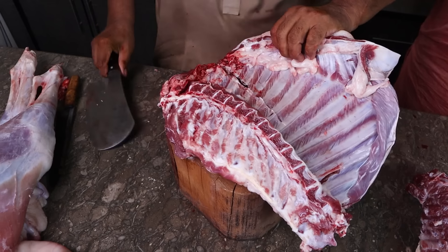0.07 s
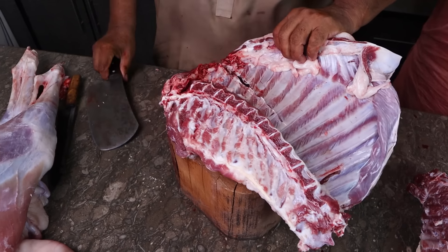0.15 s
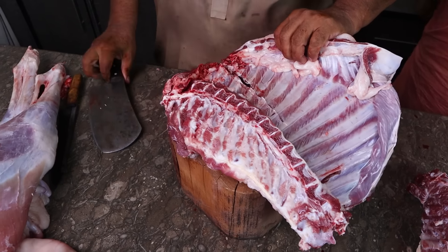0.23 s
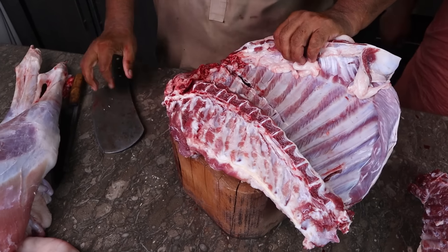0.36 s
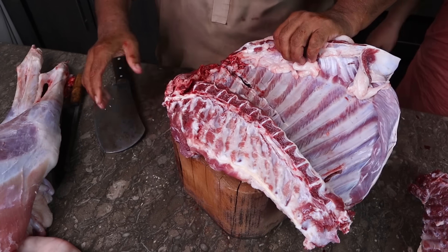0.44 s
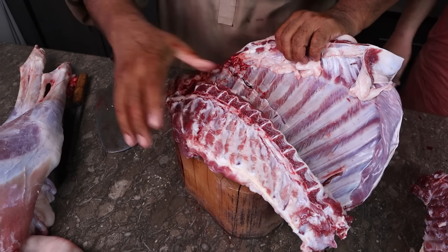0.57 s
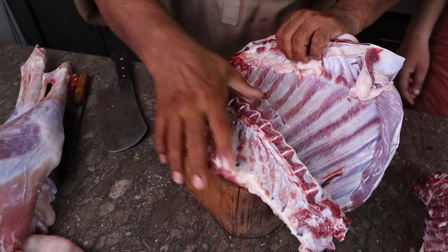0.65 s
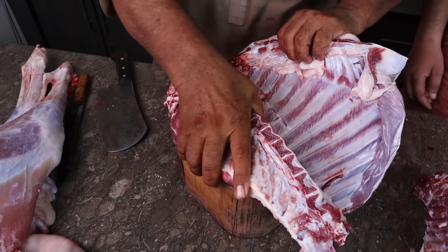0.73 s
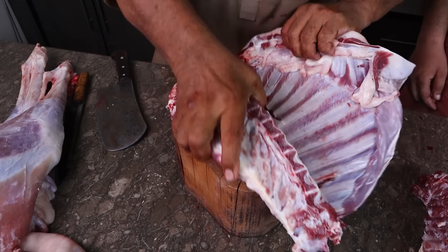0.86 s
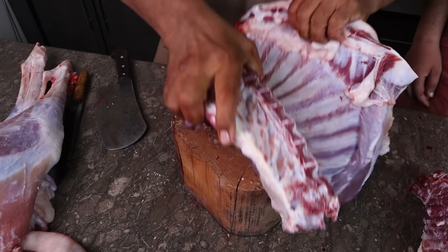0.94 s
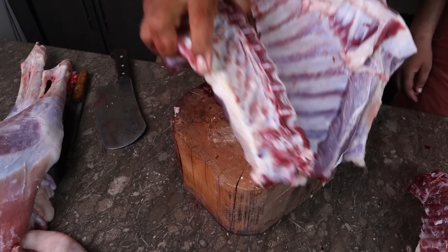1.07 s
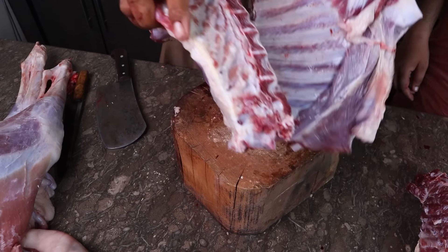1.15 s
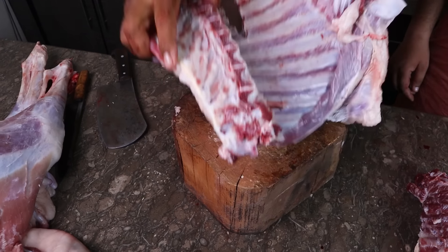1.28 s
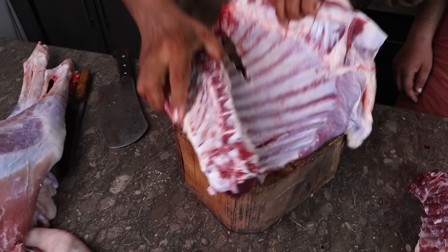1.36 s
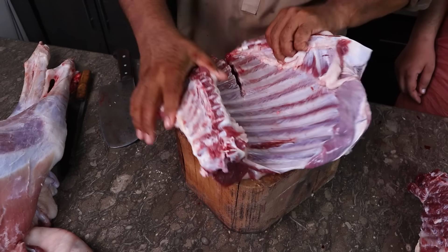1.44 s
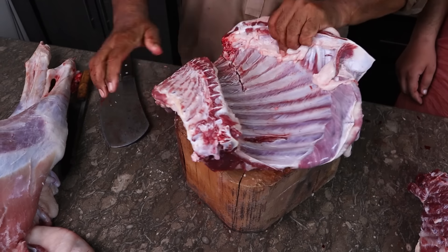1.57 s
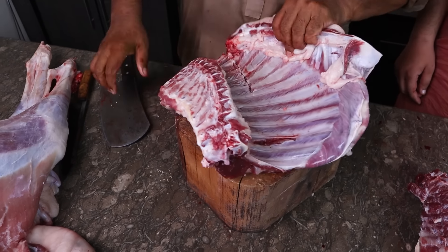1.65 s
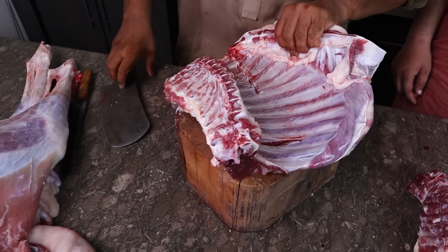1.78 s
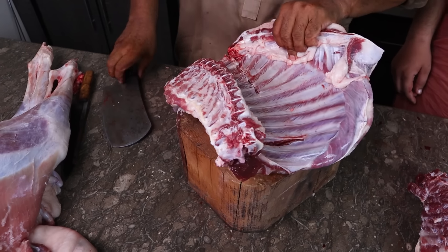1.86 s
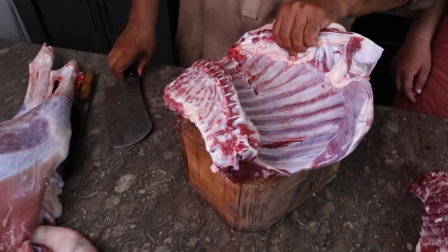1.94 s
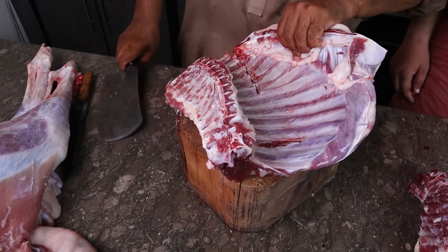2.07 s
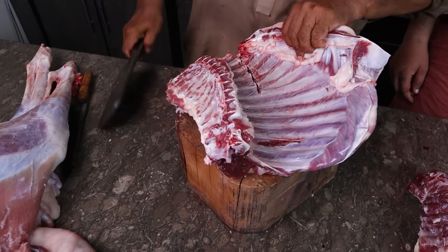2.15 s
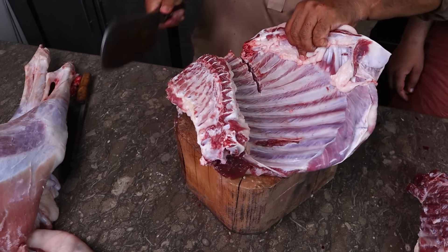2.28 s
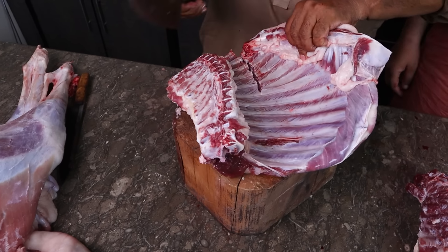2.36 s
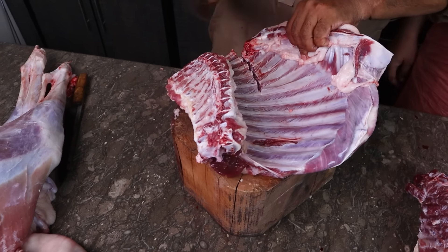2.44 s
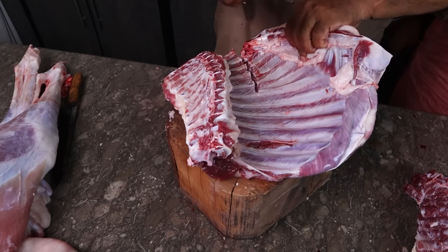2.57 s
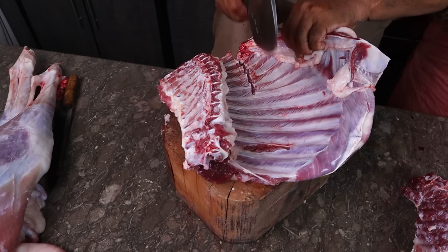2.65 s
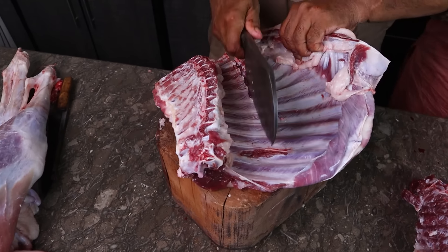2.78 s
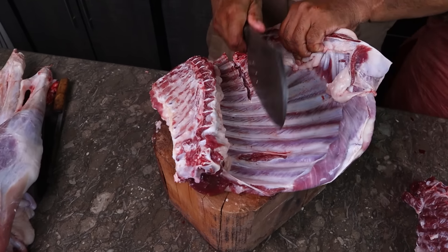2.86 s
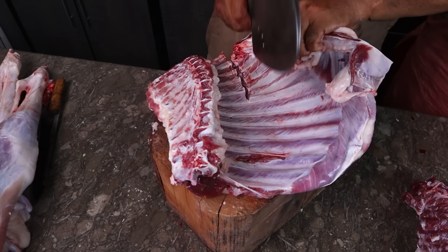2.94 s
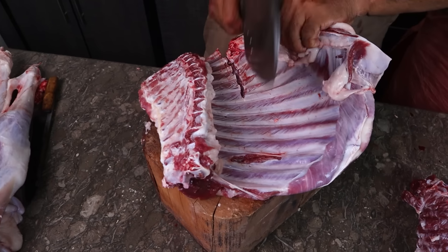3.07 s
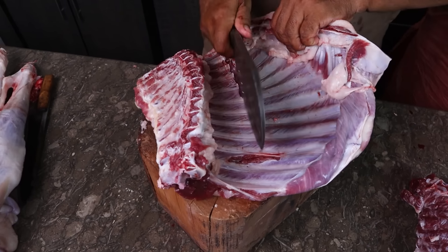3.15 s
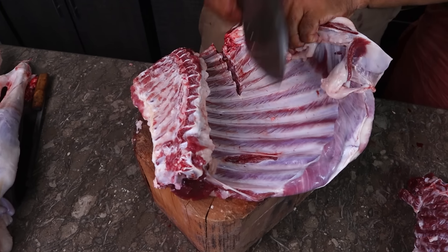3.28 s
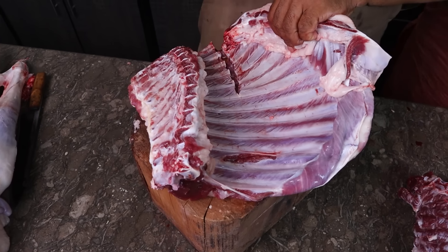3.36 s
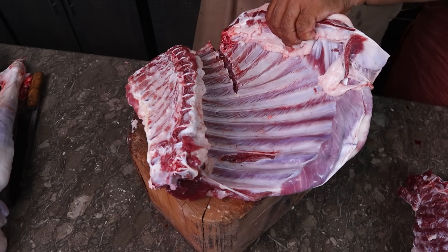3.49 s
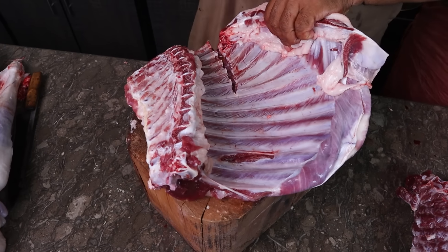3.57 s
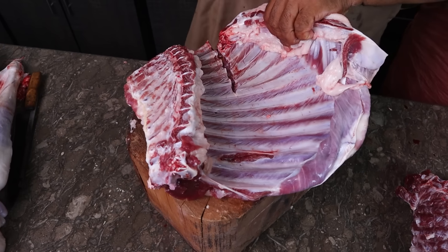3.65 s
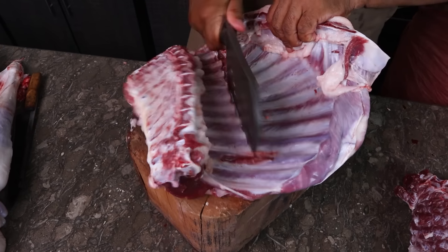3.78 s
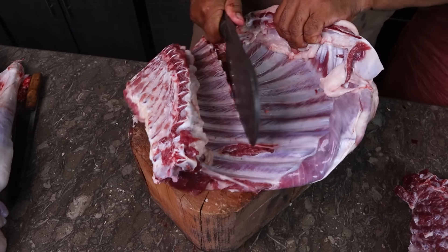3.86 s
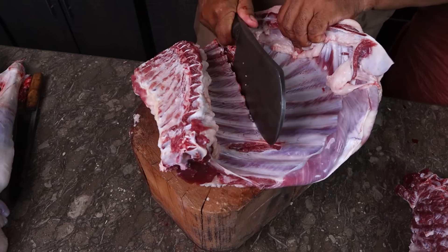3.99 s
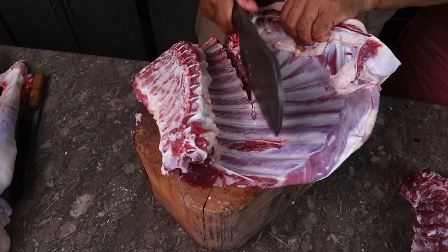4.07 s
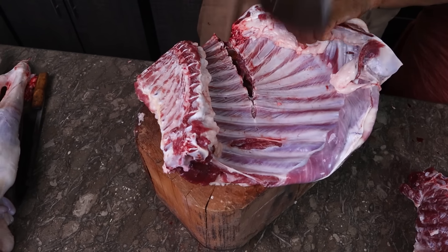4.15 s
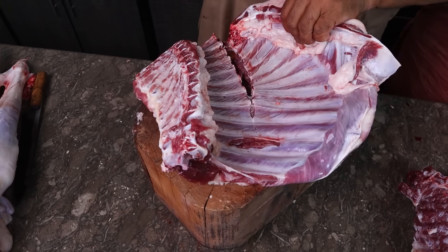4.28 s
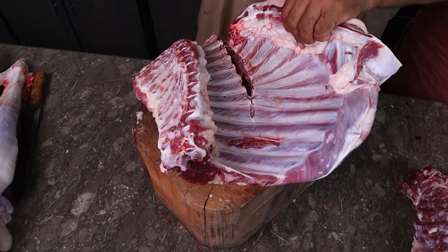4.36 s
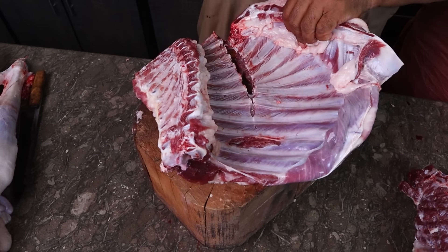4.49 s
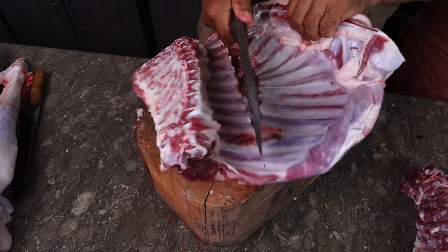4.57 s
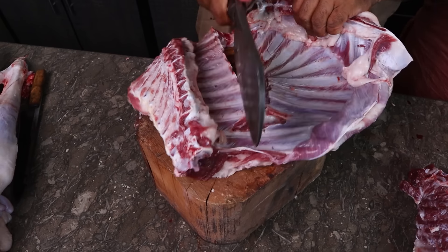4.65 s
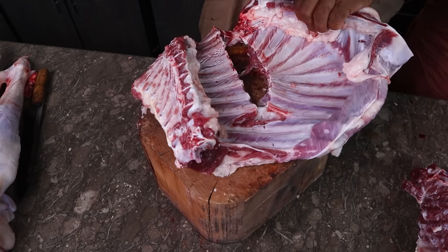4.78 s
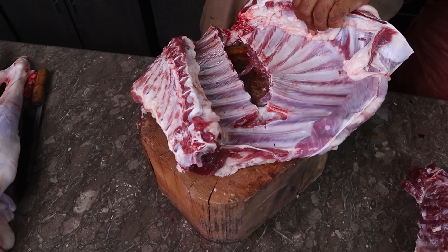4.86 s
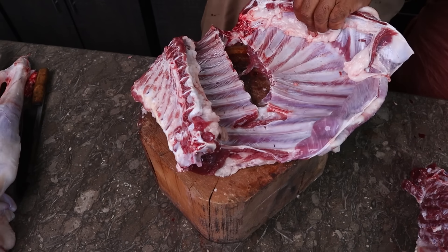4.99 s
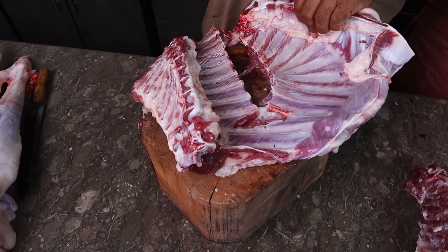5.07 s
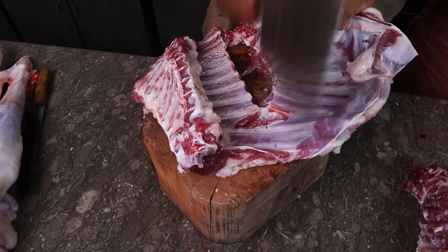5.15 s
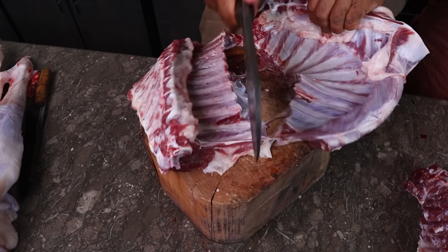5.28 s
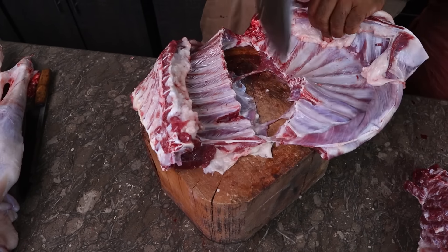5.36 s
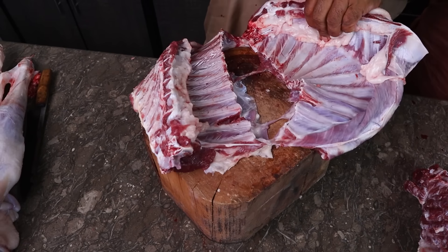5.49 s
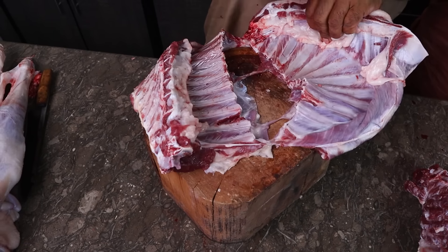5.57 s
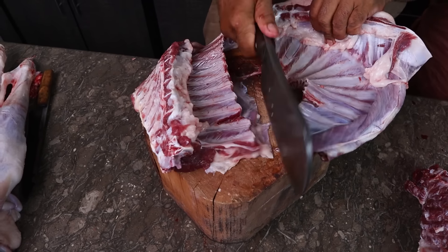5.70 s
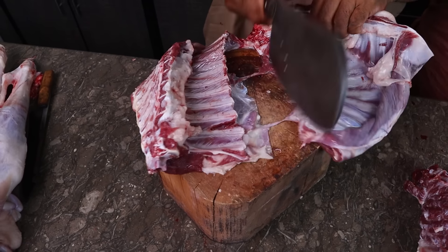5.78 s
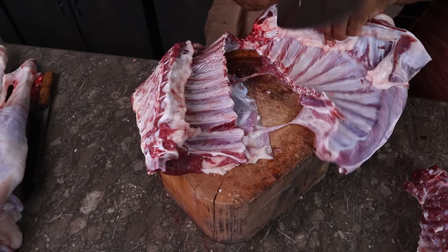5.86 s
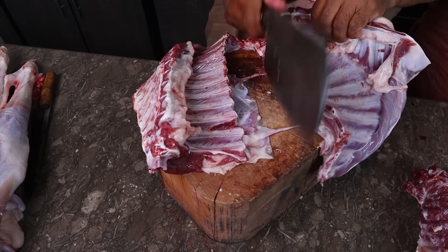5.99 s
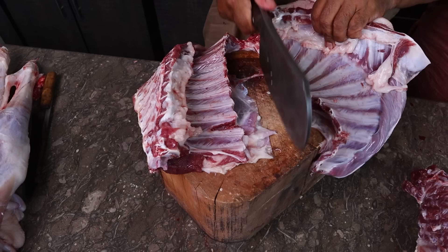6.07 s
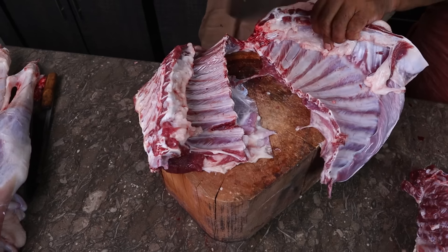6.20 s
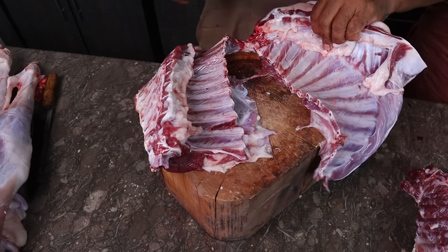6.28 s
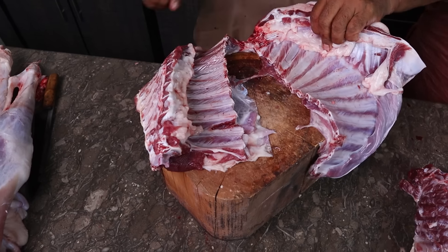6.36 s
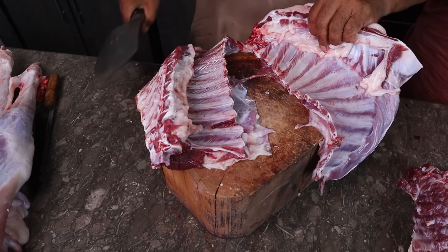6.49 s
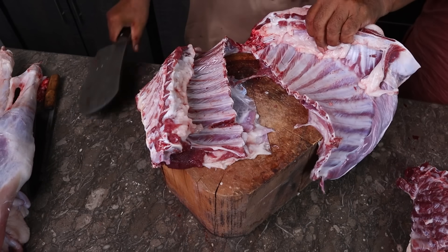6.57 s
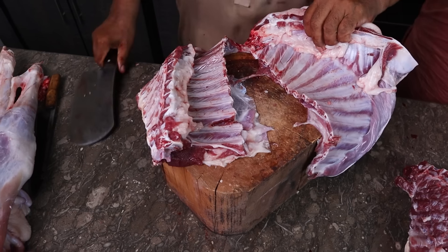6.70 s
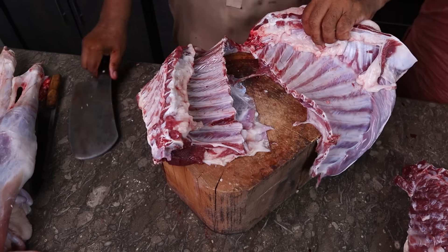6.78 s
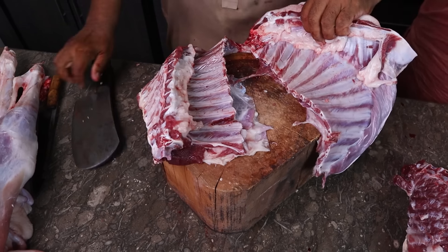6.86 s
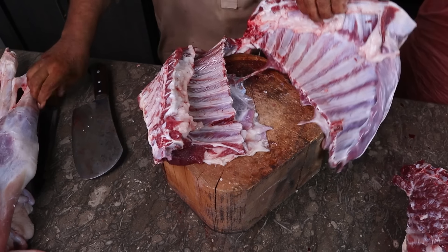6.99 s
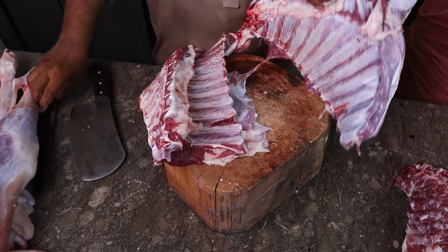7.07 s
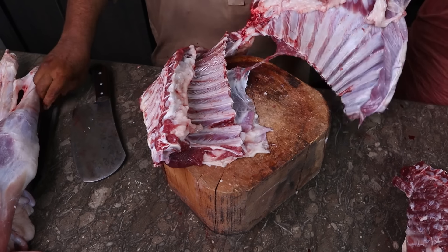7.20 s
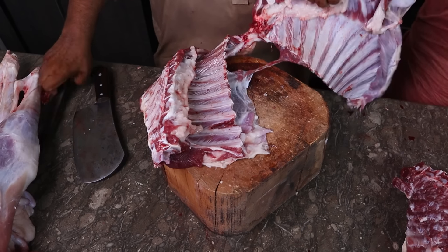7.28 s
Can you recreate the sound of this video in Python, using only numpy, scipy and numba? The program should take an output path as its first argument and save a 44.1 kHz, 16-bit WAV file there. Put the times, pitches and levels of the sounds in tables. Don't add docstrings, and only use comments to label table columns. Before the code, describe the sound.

Heard close on a phone in a small, hard, ringing room with steady fan hum and faint rattle: the blade clinks and settles on stone, hands handle sticky meat with small ticks, then uneven cleaver strokes splinter bone and knock wood, distorting and briefly ducking the background. A sharp snap comes with the last cut, then the blade rattles onto stone and rings.

```python
import sys
import numpy as np
from scipy import signal
from scipy.fft import rfft, irfft
from scipy.io import wavfile
from scipy.ndimage import uniform_filter1d
from numba import njit

SR = 44100
rng = np.random.default_rng(int(sys.argv[2]) if len(sys.argv) > 2 else 0)


def wav_record(signal):
    frames = np.transpose(np.atleast_2d(signal))
    bounded = np.clip(frames, -1, 1)
    quanta = np.round(bounded * 32767).astype(np.int16)
    wavfile.write(sys.argv[1], SR, quanta)


def ratio_of_db(decibels):
    return 10 ** (np.asarray(decibels, float) / 20)


N = 323416
T = np.arange(N) / SR

# frequency in Hz, level in dB.
BONE_SPECTRUM = [(300, 7.5), (1000, 11.5), (2000, 11), (3500, -1.5), (5000, -3), (8000, -12), (12000, -14),
                 (14500, -18), (16500, -54)]


def unit(x):
    return x / np.sqrt(np.mean(x ** 2))


def along(table, hz):
    table_hz, value = np.transpose(table)
    return np.interp(np.log(hz), np.log(table_hz), value)


def band(x, hz, width):
    edges = [hz / width, min(hz * width, .49 * SR)]
    return signal.sosfilt(signal.butter(2, edges, "bandpass", fs=SR, output="sos"), x)


def spread(table, size, tilt_db):
    hz = np.fft.rfftfreq(size, 1 / SR) + 1
    return ratio_of_db(along(table, hz) + tilt_db * np.log2(hz / 2000))


def coloured(table, size, tilt_db=0.):
    return unit(irfft(rfft(rng.standard_normal(size)) * spread(table, size, tilt_db), size))


def add(out, s, x):
    i = int(s * SR)
    out[i:i + len(x)] += x[:N - i]


def walk(rate):
    k = int(SR / rate)
    held = np.repeat(rng.standard_normal(N // k + 1), k)
    return uniform_filter1d(uniform_filter1d(held, k), k)[:N]


def ring(modes, seconds, scatter_db, push, longest=.55, loose=1):
    t = np.arange(int(seconds * SR)) / SR
    hz, db, t60 = np.array(modes, float).T[:, :, None]
    share, turn = rng.standard_normal((2, len(modes), 1))
    phase = loose * turn + np.pi * (loose < 1) * np.arange(len(modes))[:, None]
    decay = ratio_of_db(-60 * t / np.clip(t60, .005, longest))
    y = ratio_of_db(db + scatter_db * share) * np.sin(2 * np.pi * hz * t + phase) * decay
    return y.sum(0) / np.sqrt(np.sum(ratio_of_db(2 * db))) * (1 - np.exp(-t / push))


def wood(s, thud_db, thud_hz, knock_db):
    # frequency in Hz, level in dB, t60 in seconds.
    block_modes = [(349, -3, 0.013), (423, 0.5, 0.02), (411, -1.5, 0.031), (520.4, 4.5, 0.022),
                   (636.6, 2.5, 0.015), (754, 2, 0.024), (938, -15, 0.06), (1004, -5, 0.027),
                   (1260, -8.5, 0.018), (1625, -1, 0.0077)]
    # ratio to the thud pitch, level in dB, t60 in seconds.
    counter_modes = [(.62, -9, .04), (1, 0, .05), (1.3, -4, .04), (1.56, -2, .06), (1.95, -3, .04)]
    out = np.zeros(N)
    block = np.minimum(block_modes, [20000, 20, .045])
    counter = np.minimum(counter_modes, [3, 20, .08]) * [thud_hz, 1, 1]
    add(out, s, ratio_of_db(knock_db + 17.5) * ring(block, .2, 0.93, 0.0016, loose=0.12))
    add(out, s + 0.0017, ratio_of_db(thud_db + 10.0) * ring(counter, .3, 1.03, 0.0014, loose=0.3))
    return out


def crack(fast, slow, slow_db, tilt_db=0.):
    t = np.arange(4096) / SR
    grain = ratio_of_db(3.2 * np.repeat(rng.standard_normal(64), 64))
    burst = np.exp(-(t / fast) ** 2) * (1 - np.exp(-t / 0.0012))
    crunch = ratio_of_db(slow_db) * grain * np.exp(-t / slow)
    return coloured(BONE_SPECTRUM, 4096, tilt_db) * (burst + crunch)


def sideways(db, tilt_db):
    return ratio_of_db(db) * unit(np.roll(irfft(spread(BONE_SPECTRUM, 256, tilt_db)), 128))


def strokes():
    # start in seconds, counter thud in dB, thud pitch in Hz, block knock in dB, bone crack in dB.
    chops = [
        (3.28, -18.5, 126, -38, -30),
        (3.931, -4.5, 170.5, -12.5, -15),
        (4.7056, -5, 176, -10.5, -17),
        (5.3325, -10.5, 177, -8, -14.5),
        (5.848, -9.5, 176, -6.5, -11),
        (6.180, -11.5, 182, -9.5, -20.5),
    ]
    body, cracks, echoed = np.zeros((3, N))
    for s, thud_db, thud_hz, knock_db, crack_db in chops:
        tilt_db = -1.27 + 0.28 * np.clip(thud_db - knock_db, -6, 8)
        body += wood(s + 0.002552, thud_db, thud_hz, knock_db)
        add(cracks, s + 0.001282, ratio_of_db(crack_db + 3.5) * crack(0.0088, 0.025, -9.5, tilt_db))
        add(echoed, s, sideways(crack_db + 4.6, tilt_db))
    return body, cracks, echoed


def snaps():
    # start in seconds, level in dB.
    later_bones = [
        (3.935, -36),
        (3.942, -28),
        (3.945, -10),
        (4.713, -28),
        (4.726, -60),
        (5.335, -20),
        (5.856, -12),
        (6.202, -3),
    ]
    out = np.zeros(N)
    for s, db in later_bones:
        add(out, s, ratio_of_db(db) * crack(0.00045, 0.005, -59))
    return out


def blade(modes):
    hz = 1400 * 10 ** rng.random(260)
    swarm = np.transpose([hz, -3.0 * np.log2(hz / 4000), 0.55 * (hz / 4000) ** -.4])
    size = int(.7 * SR)
    chatter = walk(90)
    out = ratio_of_db(-3.5 + 2 * chatter[:size]) * ring(swarm, .7, 4., .0005)
    for k, (hz, db, t60) in enumerate(modes):
        twins = [(hz, 0, t60), (hz + 28 * rng.uniform(-1.4, 1.4), -6, t60)]
        flutter = chatter[(k + 1) * size // 4:][:size]
        out += ratio_of_db(db - 5 + 5 * flutter) * ring(twins, .7, 1., .0005, longest=1)
    return out


def cleaver_laid():
    # start in seconds, thud in dB, knock in dB, crack in dB, blade ring in dB.
    landings = [
        (.226, -64, -24, -19, -29.5),
        (.257, -62, -37, -43, -36),
        (.427, -20, -26.5, -28.5, -37),
        (.465, -23.5, -38, -50, -40.5),
        (6.796, -56, -22.5, -21.5, -31),
        (6.826, -35, -30, -55, -30),
        (6.995, -20, -26, -27, -31),
    ]
    # frequency in Hz, level in dB, t60 in seconds.
    tip_modes = [(740, -2, .4), (1290, 3, .45), (2078, 6, .42), (2832, -5, .4), (4210, -5, .5),
                 (4805, 0, .62), (6735, -9, .45), (8970, -14, .35), (10820, -6, .3), (12905, -10, .4),
                 (14160, -28, .3), (15250, -30, .3)]
    # frequency in Hz, level in dB, t60 in seconds.
    heel_modes = [(740, -3, .4), (1290, -1, .4), (2050, -7, 0.35), (2900, -14, .3), (4250, -16, 0.3),
                  (4797, 3, 0.55), (6735, -13, 0.4), (7740, -21, 0.2), (9000, -13, .35), (10820, -20, 0.33),
                  (11600, -22, 0.33), (12905, -10, 0.5), (15000, -34, .3)]
    # frequency in Hz, level in dB, t60 in seconds.
    shaken_modes = [(1720, -7, .6), (2078, -1, .65), (2900, -3, .5), (4190, -3, .35), (4800, -5, .7),
                    (5380, -8, .35), (6735, -10, .25), (12905, -18, .3)]
    body, cracks, echoed = np.zeros((3, N))
    for s, thud_db, knock_db, crack_db, ring_db in landings:
        resting_modes = tip_modes if s < N / SR / 2 else heel_modes
        on_handle = thud_db > knock_db
        modes = shaken_modes if on_handle else resting_modes
        reach = 1 if on_handle else .6
        knock = wood(s, thud_db, 230, knock_db)
        body += reach * knock
        cracks += (1 - reach) * knock
        add(cracks, s - .001, ratio_of_db(crack_db) * crack(0.0037, 0.01, -8.5))
        add(cracks, s, ratio_of_db(ring_db) * blade(modes))
        add(echoed, s, reach * sideways(crack_db + 2.5, 4.8))
    return body, cracks, echoed


def tings():
    EDGE_HZ, HEEL_HZ, TIP_HZ, HOOK_HZ, LOOSE_HZ, BACK_HZ = 4797, 10820, 12905, 2900, 5900, 6735
    # start in seconds, level in dB, pitch in Hz, t60 in seconds.
    touches = [(2.135, -49, EDGE_HZ, .35), (2.975, -50, HOOK_HZ, .5), (3.02, -47, HOOK_HZ, .55),
               (3.284, -40, EDGE_HZ, .45), (3.284, -42, HEEL_HZ, .2), (3.284, -48, BACK_HZ, .35),
               (5.852, -44, TIP_HZ, .3), (5.908, -40, EDGE_HZ, .15), (6.185, -46, TIP_HZ, .25),
               (6.207, -35, EDGE_HZ, .35), (6.7, -50, LOOSE_HZ, .05), (6.7, -50, 3400, .05),
               (2.25, -38, 640, .25)]
    out = np.zeros(N)
    for s, db, hz, t60 in touches:
        add(out, s, ratio_of_db(db) * ring([(hz, 0, t60)], .5, 0, .004))
    return ratio_of_db(-8.5 + 2 * walk(60)) * out


def ticks():
    # start in seconds, peak level in dB, pitch in Hz.
    small_contacts = [
        (1.065, -35, 1430),
        (1.1021, -24.5, 1740),
        (1.128, -34, 1630),
        (1.474, -34, 1150),
        (1.5604, -32, 1510),
        (1.88, -41, 1000),
        (2.2713, -40, 1300),
        (2.9428, -30, 1450),
        (4.904, -40, 1130),
        (5.233, -36.5, 1180),
    ]
    out = np.zeros(N)
    for s, db, hz in small_contacts:
        add(out, s, ratio_of_db(db - 8) * band(crack(0.0029, 0.014, -3), hz, 1.4))
    return out


def bumps():
    # start in seconds, peak level in dB, pitch in Hz.
    soft_bumps = [(0.779, -19, 125), (1.058, -34, 278), (1.458, -26, 108), (1.875, -24, 278), (2, -36, 94),
                  (2.7, -33, 86), (2.865, -16.5, 99), (2.927, -53, 75), (3.528, -35, 163),
                  (3.831, -23, 100), (4.167, -3.5, 180), (4.949, -6, 174)]
    out = np.zeros(N)
    for s, db, hz in soft_bumps:
        t60 = .055 * ratio_of_db(-.4 * max(db + 30, 0))
        modes = [(hz, 0, t60), (0.665 * hz, -3, t60), (1.1 * hz, -4, t60)]
        add(out, s, ratio_of_db(db) * ring(modes, 0.37, 0.79, 0.0095))
    return out


def rustle():
    # middle in seconds, half length in seconds, level in dB, brightness in dB.
    moves = [(0.947, .015, -59, 4), (1.107, 0.015, -38.5, -16), (1.136, 0.0083, -36.5, -9),
             (1.16, .01, -55, 9), (1.253, 0.045, -81, 15), (1.483, 0.011, -78, -2),
             (1.51, 0.0015, -39, -10), (1.566, 0.0037, -37, -8), (1.6, 0.0026, -40.5, 1),
             (1.878, 0.0039, -46, -20), (2.054, 0.018, -52, -20), (2.226, 0.069, -48, -11),
             (2.412, 0.017, -54, -16), (2.65, 0.047, -59, 4), (3.03, 0.056, -55, -22),
             (3.14, 0.012, -65, 8), (3.25, 0.012, -62, -12)]
    clicks = (rng.random(N) < 1500 / SR) * ratio_of_db(2.5 * rng.exponential(size=N)) * rng.standard_normal(N)
    stuff = unit(clicks) * .6 + rng.standard_normal(N)
    dull = unit(band(stuff, 3600, 2.2))
    bright = unit(band(band(stuff, 9800, 1.45), 9800, 1.5))
    handling = np.clip(np.minimum(T - .1, 3.9 - T) / .15, 0, 1)
    out = ratio_of_db(-63) * handling * (dull + ratio_of_db(-5) * bright)
    for s, half, db, bright_db in moves:
        out += ratio_of_db(db) * np.exp(-((T - s) / half) ** 2) * (dull + ratio_of_db(bright_db) * bright)
    return ratio_of_db(-10.5) * out


def whistle():
    # time in seconds, pitch in Hz, level in dB.
    glides = [
        [(0.06, 11000, -71), (0.112, 13200, -64), (0.2, 11600, -72)],
        [(2.04, 11700, -71), (2.078, 11800, -67), (2.284, 12600, -65), (2.324, 11300, -74), (2.42, 11000, -76)],
        [(6.48, 12100, -77), (6.57, 12500, -76), (6.655, 13900, -65), (6.69, 13300, -70), (6.72, 13700, -61),
         (6.78, 14800, -76)],
    ]
    out = np.zeros(N)
    breathy = unit(signal.lfilter([1], [1, -.97], rng.standard_normal(N)))
    for rows in glides:
        s, hz, db = np.transpose(rows)
        phase = 2 * np.pi * np.cumsum(np.interp(T, s, hz) * (1 + .02 * walk(30))) / SR
        gate = uniform_filter1d(ratio_of_db(np.interp(T, s, db, left=-120, right=-120)), size=1500)
        out += gate * ratio_of_db(2.7 * walk(37)) * breathy * np.sin(phase)
    return out


def room(x):
    # frequency in Hz, t60 in seconds.
    decay_times = [(60, 0.43), (125, 0.98), (250, 0.72), (500, 0.66), (1000, 0.72), (2000, 0.47),
                   (4000, 0.62), (8000, 0.34), (14000, 0.73)]
    # frequency in Hz, level in dB.
    echo_levels = [(50, -4), (100, -5), (200, -8.5), (600, -1.5), (1500, -6.5), (4000, -9), (9000, -5.5),
                   (15000, -22)]
    # frequency in Hz, level in dB, t60 in seconds.
    standing_waves = [(111.4, 0, 0.86), (176, 8, 0.5), (233, -1, 0.93), (283.7, 5.5, 0.59),
                      (528.5, 6, 0.75)]
    t = np.arange(SR) / SR
    tail = ratio_of_db(-22.5) * ring(standing_waves, 1, 0, 0.0022, longest=0.99)
    for hz in 71 * 2 ** np.arange(0, 8.1, .5):
        fall = ratio_of_db(along(echo_levels, hz) - 60 * t / along(decay_times, hz))
        tail += fall * band(rng.standard_normal(SR), hz, 2 ** 0.23)
    build_up = 1 - np.exp(-(t / 0.005) ** 2)
    return signal.fftconvolve(x, tail * build_up)[:N]


def fans():
    # frequency in Hz, level in dB per Hz.
    fan_spectrum = [(18, -46), (30, 6), (128, 3), (291, -4), (350, 4), (593, -3), (904, -2), (2160, -13),
                    (3130, -21), (3380, -24.5), (4530, -26), (5890, -31), (10300, -32.5), (13700, -42),
                    (16500, -70)]
    # time in seconds, level in dB.
    background_level = [(0, -3), (1, -1.5), (2, -4), (3, -4.5), (4, -3.5), (5, -4), (6, -9), (7.33, 3.5)]
    # frequency in Hz, level in dB, t60 in seconds.
    rattle_modes = [(390, 6, .08), (900, 3, .06), (3400, 2.5, .04), (5900, -1, .03)]
    noise, swell, air = coloured(fan_spectrum, size=N), walk(2.67), np.zeros(N)
    for hz in 35 * 2 ** np.arange(0, 9.1, .5):
        flicker = ratio_of_db(.7 * swell + 1.3 * walk(12))
        air += flicker * band(np.roll(noise, rng.integers(N)), hz, 2 ** .25)
    taps = (rng.random(N) < 70 / SR) * ratio_of_db(2.2 * rng.exponential(size=N) + 2 * walk(3))
    loose = signal.fftconvolve(taps, ring(rattle_modes, .1, 0, 0.00011))[:N]
    level = ratio_of_db(-44.5 + np.interp(T, *np.transpose(background_level)))
    return level * (unit(air) + ratio_of_db(-14.5) * unit(loose))


def scene():
    chop_body, chop_cracks, chop_echoed = strokes()
    laid_body, laid_cracks, laid_echoed = cleaver_laid()
    near = chop_body + laid_body + snaps() + ticks() + bumps() + rustle()
    cracks = chop_cracks + laid_cracks
    echoes = ratio_of_db(-29) * room(near + chop_echoed + laid_echoed)
    return (near + cracks + echoes + tings() + whistle() + fans())[None]


@njit
def follow(x, attack, release):
    y, e = np.empty(len(x)), 0.
    for i in range(len(x)):
        e += (abs(x[i]) - e) * (attack if abs(x[i]) > e else release)
        y[i] = e
    return y


def roll_off(x):
    return signal.sosfilt(signal.butter(12, 15750, fs=SR, output="sos"), x)


def record(dry):
    x = np.tanh(1.633 * dry[0]) / 1.108
    x = signal.sosfilt(signal.butter(2, 95, "highpass", fs=SR, output="sos"), x)
    x = signal.sosfilt(signal.butter(2, 14500, fs=SR, output="sos"), x)
    loudness = follow(x, 1 / (0.00043 * SR), 1 / (.3 * SR))
    ducked = ratio_of_db(4.5) * x * (1 + loudness / ratio_of_db(-21.5)) ** -.4
    hiss = ratio_of_db(-92) * rng.standard_normal(N)
    return roll_off(np.clip(ducked + hiss, -.9, .9)[None])


dry = scene()
out = record(dry)
wav_record(out)
```